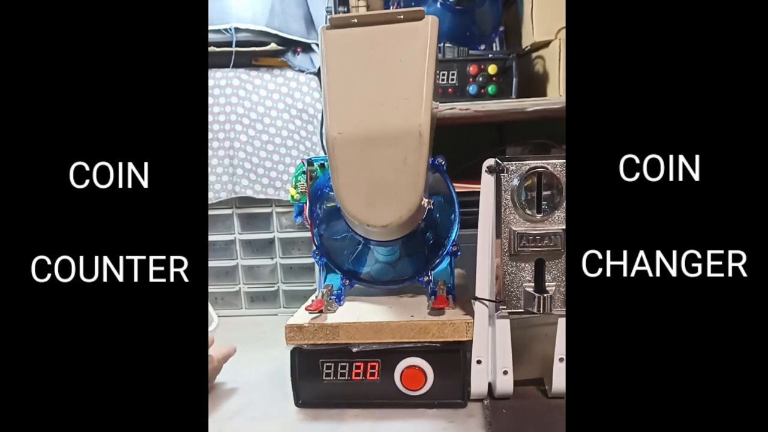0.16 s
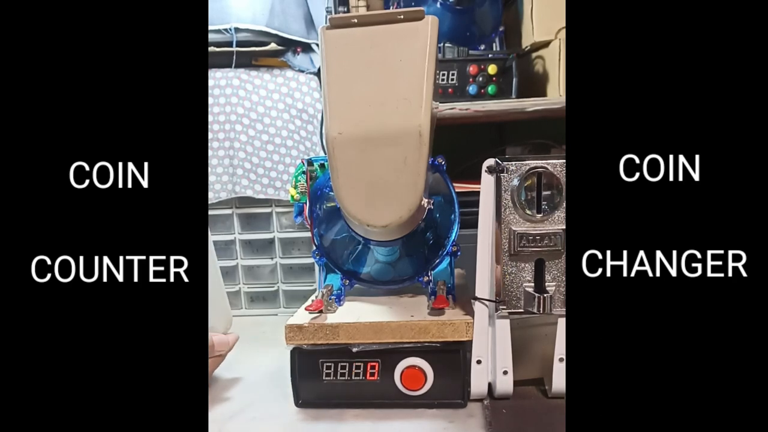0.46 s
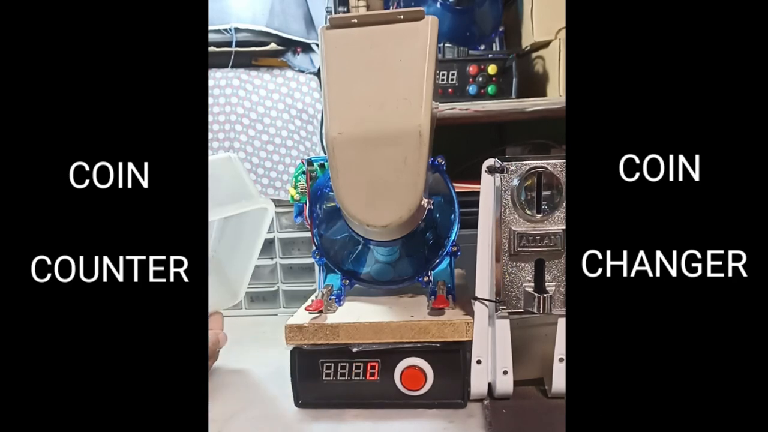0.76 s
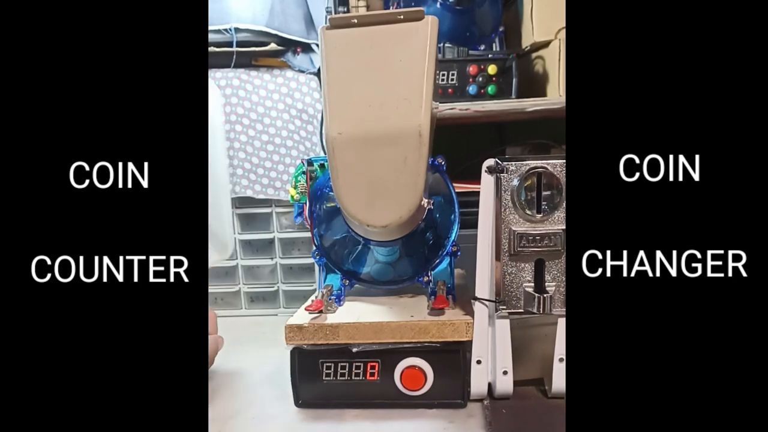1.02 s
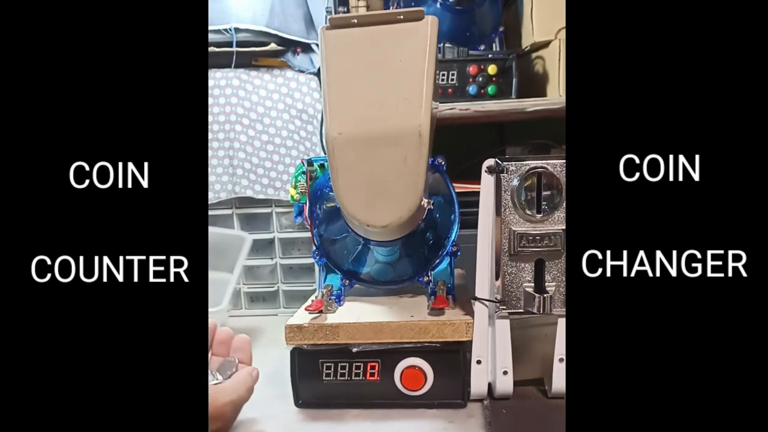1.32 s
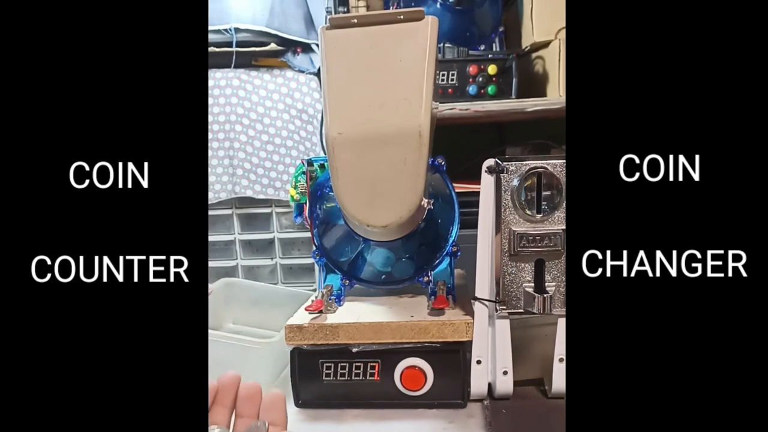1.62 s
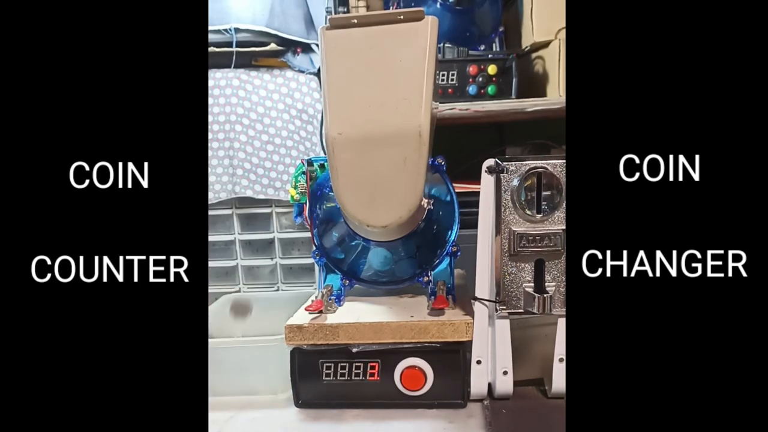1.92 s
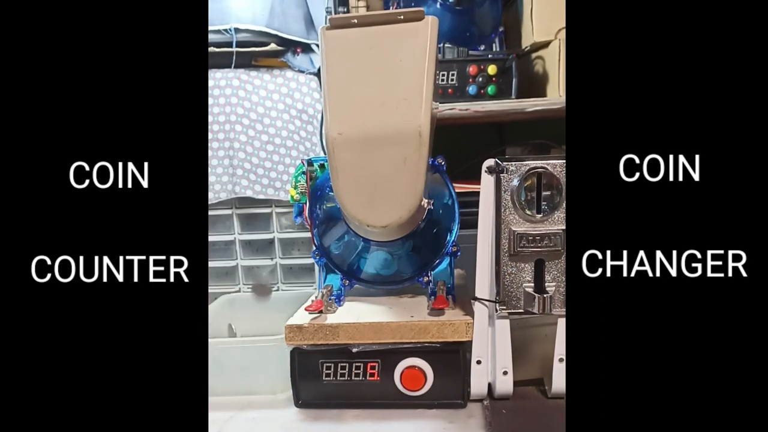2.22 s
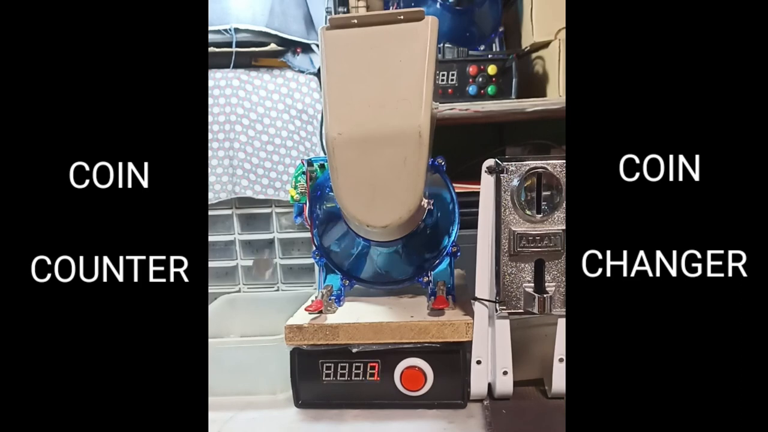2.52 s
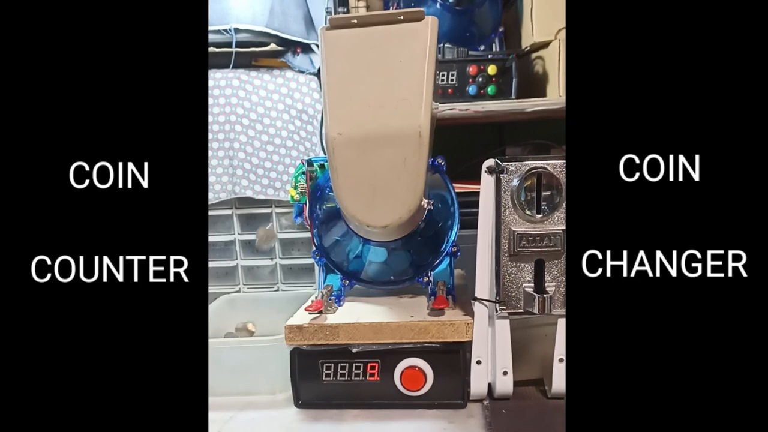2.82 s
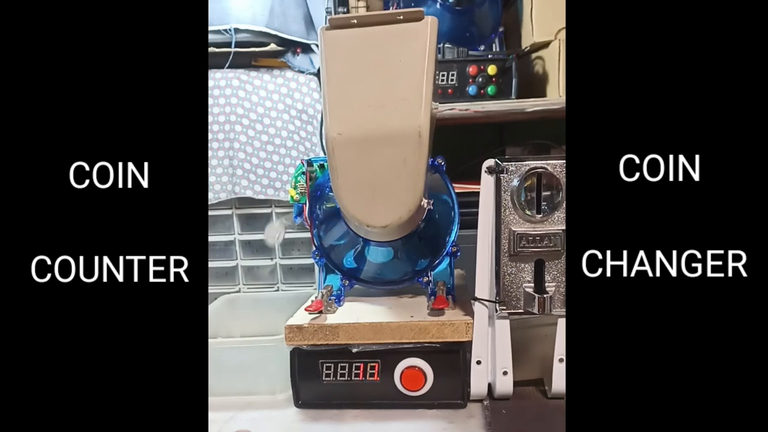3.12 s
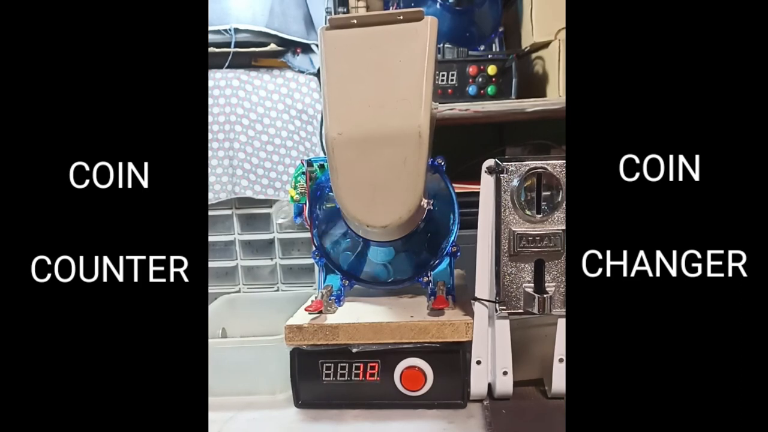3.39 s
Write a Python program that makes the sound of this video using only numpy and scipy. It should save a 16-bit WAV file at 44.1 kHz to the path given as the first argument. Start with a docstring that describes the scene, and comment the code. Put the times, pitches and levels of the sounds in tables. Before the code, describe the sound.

Coins clatter from a plastic tub, then tumble in a small machine that flings them out knocking

```python
"""A small, dry room: coins are tipped out of a plastic tub into a palm, then a small coin machine starts.
Coins tumble on its turning disc, and about six times a second one is thrown out and knocks into the tub.
Plastic tub and housing are noise bursts through resonances; coin on coin is scratchy noise and high damped
tones; the disc's rasp is banded noise with brief chirps. Low handling rumble, soft swells of band noise
for rustles, scrapes and the motor starting up, and a quiet floor lie beneath.
"""
import sys
import numpy as np
from scipy import signal
from scipy.fft import rfft, irfft, next_fast_len
from scipy.io import wavfile

SR = 44100
rng = np.random.default_rng(int(sys.argv[2]) if len(sys.argv) > 2 else 0)


def waveform_to_disk(signal):
    """Save audio, clipped to [-1, 1], as 16-bit WAV at the path in sys.argv[1]."""
    frames = np.transpose(np.atleast_2d(signal))
    scaled = np.clip(frames, -1, 1) * 32767
    samples = np.round(scaled).astype(np.int16)
    wavfile.write(sys.argv[1], SR, samples)


N = 156555

# Layer levels are taken before each layer's trim; resonance and colour levels are relative.
# spectrum of the quiet floor: (frequency [Hz], level [dB])
FLOOR_COLOUR = [(59, -38.5), (100, -8), (574, -11.5), (730, -9), (896, -15.5), (1970, -25.5), (6000, -27),
                (7800, -75), (13200, -120)]
# low rumble from handling: (time [s], level [dB])
RUMBLE_LEVEL = [(0.0, -47), (0.34, -68), (0.73, -55.5), (1.36, -67.5), (1.42, -36), (1.5, -60),
                (2.8, -34.5), (2.87, -56), (2.94, -31.5), (3.03, -63.5), (3.25, -31), (3.29, -44),
                (3.51, -34), (3.55, -47)]
# spectrum of that rumble: (frequency [Hz], level [dB])
RUMBLE_COLOUR = [(11, -33), (18, 5), (50, 1.5), (83, -0.5), (135, -14.5), (200, -12), (260, -33),
                 (440, -120)]
# soft rustles and scrapes of hand and tub, then the motor starting up:
# (start [s], length [s], level [dB], centre [Hz], offset from centre that is 12 dB down [Hz])
SOFT_SWELLS = [(0.025, 0.16, -48, 740, 650), (0.222, 0.092, -57, 1310, 850), (0.865, .24, -45.5, 1600, 110),
               (0.962, 0.33, -60.5, 800, 80), (1.437, 0.35, -53.5, 1230, 595),
               (1.534, 0.44, -28.5, 1216, 290)]
# coins sliding and knocking in the tub: (time [s], level [dB])
POUR_LEVEL = [(0.356, -94), (0.39, -42.5), (0.434, -31.5), (0.45, -22), (0.538, -30), (0.544, -12.5),
              (0.752, -19.5), (1.128, -66.5), (1.2, -81)]
# single coins striking the tub while it is tipped:
# (time [s], peak [dB], low thump of the tub's base relative to it [dB])
TIP_HITS = [(0.392, -44, -9), (0.437, -12, -26), (0.448, -13.5, -21), (0.461, -1.5, -23),
            (0.493, -7.5, -15), (0.504, -9, -19), (0.544, -4.5, -6), (0.547, -11, -8), (0.562, -4, -4.5),
            (0.575, -11, 0.5), (0.591, -8, -11), (0.603, -11.5, -6.5), (0.614, -1, -19), (0.638, -3, -13.5),
            (0.648, -7, -20.5), (0.655, -18, -13.5), (0.704, -8.5, -17.5), (0.742, -6.5, -26),
            (0.758, -18, -18.5), (0.81, -18, -33.5), (0.823, -18.5, -22.5), (0.871, -21, -16)]
# resonances of the tub held in the hand: (frequency [Hz], width [Hz], level [dB])
HELD_TUB_MODES = [(416, 60, -5.5), (731, 188, 2.5), (1405, 148, 7.5), (2045, 78, 2.5), (2345, 110, -3.5),
                  (2880, 89, -8.5), (3320, 270, -8.5), (5800, 2200, -15.5)]
# resonances of the tub's base: (frequency [Hz], width [Hz], level [dB])
TUB_BASE_MODES = [(372, 38, 7), (262, 130, -13.5)]
# thrown coins landing in the tub on the table: (time [s], peak [dB])
LANDINGS = [(1.988, -3), (2.15, -4), (2.321, -1.5), (2.462, 0), (2.623, 0), (2.783, -3.5), (2.928, -3.5),
            (3.114, -6.5), (3.252, -13), (3.414, -9.5)]
# resonances of the tub on the table: (frequency [Hz], width [Hz], level [dB])
TABLE_TUB_MODES = [(233.4, 74, -4), (428, 67, 5), (690, 510, -6), (849, 160, 5.5), (1166, 220, -3),
                   (1413, 200, -2)]
# coin edge on plastic: (frequency [Hz], width [Hz], level [dB])
CLACK_MODES = [(2110, 460, -0.5), (3720, 1700, 2), (5450, 4400, -6)]
# coin against coin, two stretches:
# (time [s], level of the scratchy contact [dB], level of the high ring [dB])
JOSTLE_LEVELS = [
    [(0.33, -103, -107), (0.378, -103, -110), (0.458, -49, -44.5), (0.586, -40, -35.5), (0.596, -36, -26.5),
     (0.74, -34, -31.5), (0.98, -55, -63), (0.992, -42, -35), (1.028, -61, -71), (1.096, -37.5, -47.5),
     (1.156, -44, -52), (1.25, -120, -106)],
    [(1.5, -102, -111), (1.59, -59, -61), (1.85, -39, -46), (2.62, -37, -42.5), (2.64, -33.5, -31.5),
     (3.1, -38, -40), (3.13, -40, -21), (3.23, -54, -60), (3.25, -39, -30), (3.27, -36.5, -47),
     (3.54, -52.5, -35.5), (3.55, -44.5, -27)],
]
# spectrum of the scratchy contact: (frequency [Hz], level [dB])
SCRATCH_COLOUR = [(1470, -53), (2500, -18), (3390, -7), (6950, -1.5), (11500, -3), (13600, -18),
                  (15500, -4)]
# loud single clinks: (time [s], nominal level [dB], middle pitch [Hz])
CLINKS = [(0.499, -16, 13160), (0.595, -9.5, 13170), (0.628, -9.5, 13080), (0.7639, -14, 12980),
          (0.8118, -24.5, 13300), (0.9936, -29, 13580), (1.0474, -31, 13300), (1.0844, -24, 13100),
          (2.129, -15, 13380), (2.274, -20, 13460), (2.4446, -14.5, 13440), (2.6417, -10.5, 13040),
          (2.7349, -22.5, 12850), (2.775, -16, 13250), (2.8439, -13.5, 13600), (3.0498, -17, 13400),
          (3.117, -9.5, 13340), (3.129, -16, 12700), (3.251, -9, 13400), (3.3253, -20.5, 13600)]
# coins tumbling on the disc:
# (time [s], level of the hollow rattle and pings [dB], level of the brighter clatter [dB])
TUMBLE_LEVELS = [(1.4, -90, -92), (1.535, -60.5, -65), (1.552, -38, -42.5), (1.59, -34.5, -33.5),
                 (1.7, -27, -34), (1.73, -31, -33.5), (2.0, -23, -24.5), (2.2, -21.5, -23),
                 (2.245, -25, -37.5), (2.255, -20, -24.5), (2.35, -24, -27.5), (2.82, -23, -26),
                 (2.99, -22, -25), (3.12, -33.5, -49), (3.27, -33, -49), (3.41, -32.5, -34.5),
                 (3.55, -47.5, -76)]
# resonances of the machine housing: (frequency [Hz], width [Hz], level [dB])
HOUSING_MODES = [(215, 63, -20.5), (573, 197, 3), (834, 600, -6.5), (1074, 320, 2.5), (1480, 310, 1),
                 (1829, 160, 1)]
# spectrum of the brighter clatter: (frequency [Hz], level [dB])
CLATTER_COLOUR = [(1200, -40), (1900, 2), (2600, -0.5), (3300, 0), (5500, -9), (7500, -12.5), (9000, -120)]
# louder knocks among the tumbling coins: (time [s], peak [dB])
KNOCKS = [(1.58, -19), (1.62, -9.5), (1.666, -4.5), (1.786, -14), (1.801, 1), (1.821, 4), (1.841, 1),
          (1.864, 1), (1.884, 1), (1.915, 0.5), (1.978, -1), (2.013, 2), (2.051, -9), (2.092, 1),
          (2.193, -10.5), (2.25, 1), (2.274, 0.5), (2.371, -2), (2.397, 2.5), (2.54, -13.5), (2.576, 0.5),
          (2.61, -1), (2.72, -4.5), (2.809, -6), (2.844, 0), (2.892, -12.5), (2.95, 1.5), (3.012, -9),
          (3.045, -10), (3.082, -6), (3.128, -0.5), (3.262, -11.5), (3.274, -18.5), (3.428, -16.5)]
# rasp of the emptying disc: (time [s], level [dB])
RASP_LEVEL = [(2.7, -38), (2.8, -36.5), (2.97, -22.5), (3.096, -25), (3.132, -20), (3.158, -29),
              (3.262, -29), (3.29, -21), (3.32, -28), (3.35, -20), (3.412, -19), (3.45, -30.5),
              (3.55, -28.5)]
# resonances of the rasp, for one of its two passes: (frequency [Hz], width [Hz], level [dB])
RASP_MODES = [(3060, 340, 11), (3730, 230, 17), (4340, 540, 13.5), (5150, 170, -12), (7000, 500, 7)]

FLOOR_DB = -70
ROOM_T60_S, ROOM_DB = 0.18, -9
TOP_HZ = 15600
HIT_VARY_DB = 2.2  # mode-to-mode variation of tub tips and housing knocks
BOUNCE_S, BOUNCE_DB = 0.006, -6  # typical delay and relative peak of a landing's second hit
RING_HZ, RING_SPREAD_HZ = 13080, 290
CHIRP_HZ, CHIRP_SPREAD_HZ, CHIRP_DB = 4034, 360, -3


def amp(db):
    """Turn dB into gain."""
    return 10 ** (np.asarray(db) / 20)


def unit(x):
    """Scale to rms 1."""
    return x / np.sqrt(np.mean(x ** 2) + 1e-20)


def curve(rows, count=1):
    """Draw one level column as gain per sample: silent before the first row, held after the last."""
    rows = np.asarray(rows)
    t = np.arange(N) / SR
    return amp(np.interp(t, rows[:, 0], rows[:, count], left=-140, right=rows[-1, count]))


def filtered(x, response):
    """Multiply the spectrum of x by a complex response of frequency."""
    m = next_fast_len(N + SR // 2)
    return irfft(rfft(x, m) * response(np.fft.rfftfreq(m, 1 / SR)), m)[..., :N]


def colour(x, points):
    """Shape the spectrum through (Hz, dB) points, 60 dB down beyond both ends."""
    f, db = np.transpose(points)
    return filtered(x, lambda hz: amp(np.interp(np.log(hz + 1), np.log(f + 1), db, left=-60, right=-60)))


def body(x, peaks):
    """Ring x through a causal sum of resonances of alternating polarity."""
    def response(f):
        return sum((-1) ** k * amp(db) * 1j * f * width / (centre ** 2 - f * f + 1j * f * width)
                   for k, (centre, width, db) in enumerate(peaks))
    return filtered(x, response)


def contacts(rate, spread_db, t60, bed):
    """Random noise bursts, rate per second, over a steady bed, rms 1."""
    strength_db = spread_db * np.minimum(rng.exponential(size=N), 3)
    starts = (rng.random(N) < rate / SR) * amp(strength_db)
    t = np.arange(2000) / SR
    shape = amp(-60 * t / t60) * (1 - np.exp(-t / 0.0021))
    envelope = unit(signal.fftconvolve(starts, shape)[:N]) + bed
    return unit(envelope * rng.standard_normal(N))


def blows(rows, peaks, t60, rise_s, vary_db, push=0):
    """Noise bursts with a sharp push strike a body, its modes reweighted per hit and scaled to each peak."""
    out, t = np.zeros(N + 3000), np.arange(3000) / SR
    impulse = np.eye(1, N)[0]
    modes = np.array([(-1) ** k * body(impulse, [peak])[:3000] for k, peak in enumerate(peaks)])
    for s, db in rows:
        force = rng.standard_normal(3000) * amp(-60 * t / t60) * (1 - np.exp(-t / rise_s)) ** 2
        force[int(rise_s * SR):][:9] += push * np.hanning(9) / 4
        struck = amp(vary_db * rng.standard_normal(len(peaks))) @ modes
        hit = signal.fftconvolve(force, struck)[:3000]
        out[round(s * SR):][:3000] += amp(db) * hit / np.abs(hit).max()
    return out[:N]


def rings(s, gain, hz, t60):
    """Damped tones with a soft attack, one for each start time."""
    k = np.arange(2400)
    t = k / SR
    envelope = (1 - np.exp(-t / 0.003)) * amp(-60 * t / t60[:, None])
    wave = gain[:, None] * np.sin(2 * np.pi * hz[:, None] * t) * envelope
    places = np.round(s * SR).astype(int)[:, None] + k
    return np.bincount(places.ravel(), wave.ravel(), N + 2400)[:N]


def quiet_floor():
    """Steady coloured noise under everything."""
    return amp(FLOOR_DB) * unit(colour(rng.standard_normal(N), FLOOR_COLOUR))


def room(x):
    """A short diffuse answer: exponentially dying noise after a 3.4 ms (150-sample) delay."""
    t = np.arange(SR // 4) / SR
    tail = rng.standard_normal(SR // 4) * amp(-60 * t / ROOM_T60_S)
    return signal.fftconvolve(np.pad(x, (150, 0)), tail / np.linalg.norm(tail))[:N]


def handling_rumble():
    """Low-frequency noise whose level rises and falls as things are handled."""
    return curve(RUMBLE_LEVEL) * unit(colour(rng.standard_normal(N), RUMBLE_COLOUR))


def rustles_and_motor_start():
    """Swells of band noise: soft rustles and scrapes of hand and tub, then the motor starting up."""
    t, out = np.arange(N) / SR, np.zeros(N)
    for s, length, db, hz, width in SOFT_SWELLS:
        # the power under 1 brings the crest forward
        swell = np.sin(np.pi * np.clip((t - s) / length, 0, 1) ** 0.47).clip(0) ** 1.8
        band = filtered(rng.standard_normal(N), lambda f: amp(-12 * ((f - hz) / width) ** 2))
        out += amp(db) * swell * unit(band)
    return out


def tub_pour():
    """Sliding contacts and single hits excite the hand-held tub; its base adds low thumps."""
    pouring = np.arange(N) < POUR_LEVEL[-1][0] * SR
    sliding = contacts(390, spread_db=-2.5, t60=0.0033, bed=0.27)
    slide = curve(POUR_LEVEL) * pouring * unit(body(sliding, HELD_TUB_MODES))
    base_hits = [(s, db + low_db) for s, db, low_db in TIP_HITS]
    thumps = blows(base_hits, TUB_BASE_MODES, t60=0.0062, rise_s=0.00072, vary_db=2.0, push=1.1)

    def low_cut(hz):  # second-order high-pass at 220 Hz
        return (1j * hz / 220) ** 2 / (1 + 1j * hz / 160 + (1j * hz / 220) ** 2)

    tips = blows([row[:2] for row in TIP_HITS], HELD_TUB_MODES,
                 t60=0.025, rise_s=0.0003, vary_db=HIT_VARY_DB, push=0.99)
    return amp(-4.5) * slide + tips + filtered(thumps, low_cut)


def tub_landings():
    """Each thrown coin knocks the tub on the table, clacks on its plastic and bounces once."""
    s, db = np.transpose(LANDINGS)
    bounce_s = s + BOUNCE_S * rng.uniform(0.6, 1.3, len(s))
    drops = np.r_[np.c_[s, db], np.c_[bounce_s, db + BOUNCE_DB]]
    knocks = blows(drops, TABLE_TUB_MODES, t60=0.0091, rise_s=0.0015, vary_db=3.5, push=4)
    clacks = blows(LANDINGS, CLACK_MODES, t60=0.0087, rise_s=0.0012, vary_db=3.5)
    return knocks + amp(-4) * clacks


def coin_jostle():
    """Coin on coin: coloured contact noise and a haze of many overlapping high rings."""
    rows = np.vstack(JOSTLE_LEVELS)
    rubbing = contacts(240, spread_db=3.5, t60=0.037, bed=0.3)
    scratch = curve(rows) * unit(colour(rubbing, SCRATCH_COLOUR))
    u, g = rng.random((1300, 2)), rng.standard_normal((1300, 2))
    hz = RING_HZ + RING_SPREAD_HZ * g[:, 1]
    haze = unit(rings(u[:, 0] * N / SR, amp(4.8 * g[:, 0]), hz, 0.078 + 0.052 * u[:, 1]))
    return scratch + curve(rows, count=2) * haze


def coin_clinks():
    """Loud clinks: three close damped tones each, with a bright resonant crack at the strike."""
    s, db, hz = np.transpose(CLINKS)
    tones = np.zeros(N)
    for off_hz in (0, -230, 310):
        start = s + rng.uniform(0, 0.0029, len(s))
        gain = amp(db + 2.3 * rng.standard_normal(len(s)))
        tones += rings(start, gain, hz + off_hz, np.full(len(s), 0.022))
    crack_modes = [(7050, 290, 7), (9140, 700, -2.0), (12500, 7100, -5)]  # (Hz, width Hz, dB)
    cracks = blows(np.c_[s, db - 4], crack_modes, t60=0.022, rise_s=0.0011, vary_db=4, push=1.87)
    return tones + cracks


def disc_rasp():
    """The emptying disc rasps: contact noise through its bands twice, with brief tones of skating coins."""
    scraping = contacts(370, spread_db=4, t60=0.014, bed=0.7)
    rasp = unit(body(body(scraping, RASP_MODES), RASP_MODES))
    u, g = rng.random((900, 2)), rng.standard_normal((900, 2))
    hz = CHIRP_HZ + CHIRP_SPREAD_HZ * g[:, 1]
    chirps = unit(rings(u[:, 0] * N / SR, amp(3.5 * g[:, 0]), hz, 0.014 + 0.012 * u[:, 1]))
    return curve(RASP_LEVEL) * unit(rasp + amp(CHIRP_DB) * chirps)


def coin_pings():
    """Scattered damped tones, mostly low, each dying away within 12 to 42 of its own cycles."""
    u, g = rng.random((1400, 2)), rng.standard_normal((1400, 2))
    hz = 500 + np.minimum(900 * np.exp(0.799 * g[:, 0]), 7000)
    gain = amp(4.2 * g[:, 1]) * (1300 / hz) ** 0.17  # higher pings are a little softer
    return unit(rings(u[:, 0] * N / SR, gain, hz, (12 + 30 * u[:, 1]) / hz))


def machine():
    """Coins roll, ping and knock: one rolling noise feeds the hollow housing and a brighter clatter."""
    rolling = contacts(210, spread_db=2, t60=0.028, bed=0.8)
    hollow = curve(TUMBLE_LEVELS) * unit(body(rolling, HOUSING_MODES))
    clatter = curve(TUMBLE_LEVELS, count=2) * unit(colour(rolling, CLATTER_COLOUR))
    pings = curve(TUMBLE_LEVELS) * coin_pings()
    knock_modes = HOUSING_MODES + [(2213, 240, -2), (3020, 230, -2.5), (5600, 2500, -9.0)]
    knocks = blows(KNOCKS, knock_modes, t60=0.07, rise_s=0.001204, vary_db=HIT_VARY_DB, push=9)
    tumble = amp(-1.28) * hollow + amp(-1) * clatter + amp(-5.5) * pings
    return tumble + amp(-8.5) * knocks + amp(-5.0) * disc_rasp()


def scene():
    """Tub, coins and machine sound in the room; rumble, soft swells and floor stay dry."""
    near = tub_pour() + tub_landings() + coin_jostle() + coin_clinks() + machine()
    under = handling_rumble() + rustles_and_motor_start() + quiet_floor()
    return (near + amp(ROOM_DB) * room(near) + under)[None]


def record(dry):
    """Soft clipping just under full scale, then a steep cut of the top."""
    clipped = dry / (1 + np.abs(dry / 0.98) ** 6) ** (1 / 6)
    return filtered(clipped, lambda hz: hz < TOP_HZ)


dry = scene()
out = record(dry)
waveform_to_disk(out)
```